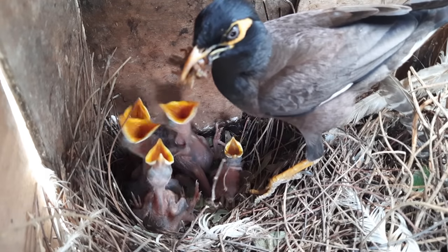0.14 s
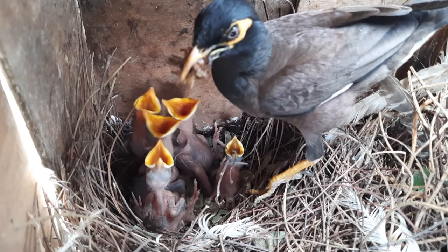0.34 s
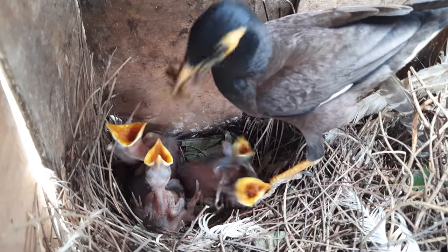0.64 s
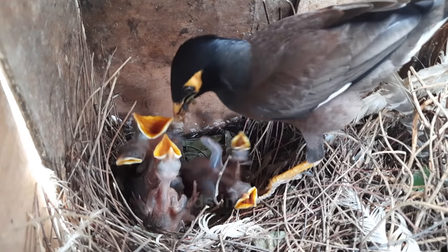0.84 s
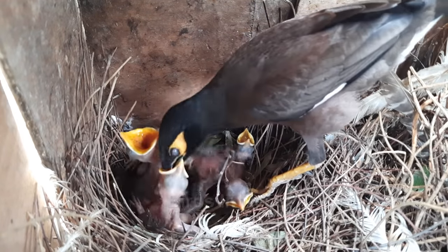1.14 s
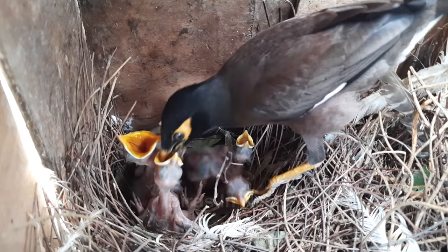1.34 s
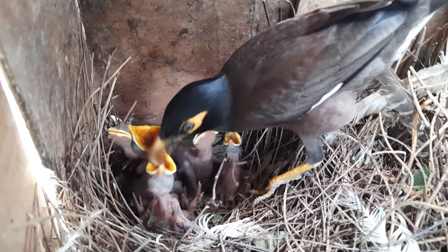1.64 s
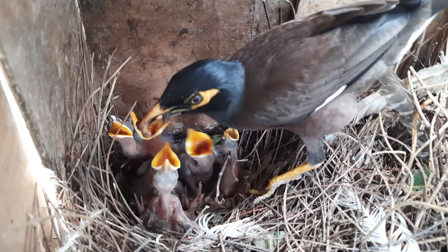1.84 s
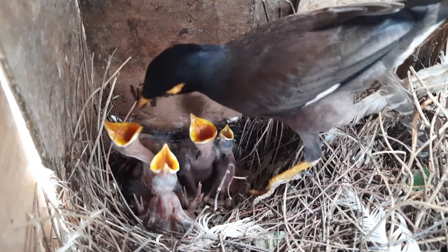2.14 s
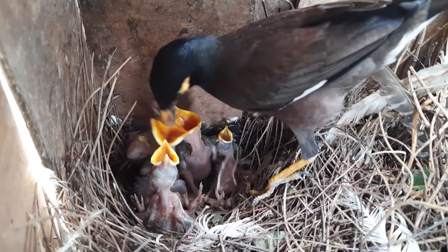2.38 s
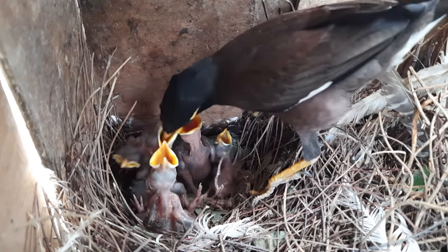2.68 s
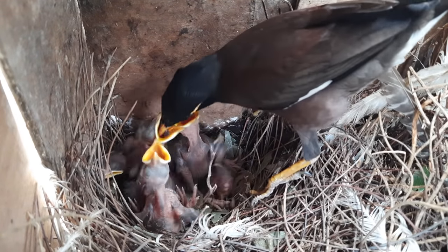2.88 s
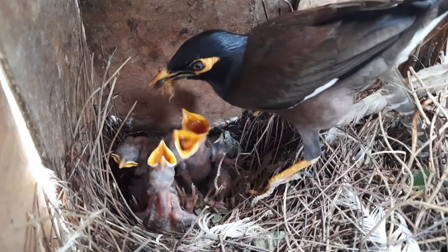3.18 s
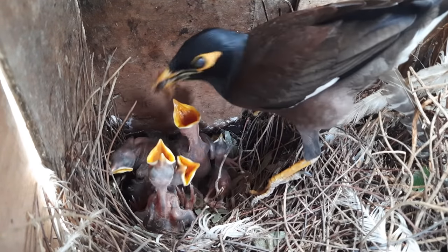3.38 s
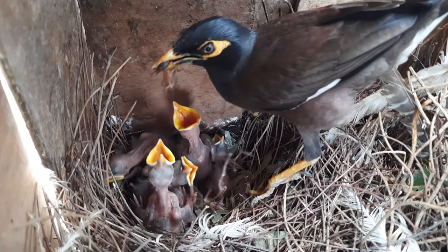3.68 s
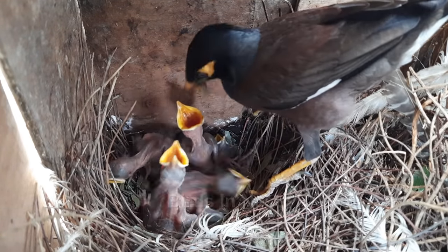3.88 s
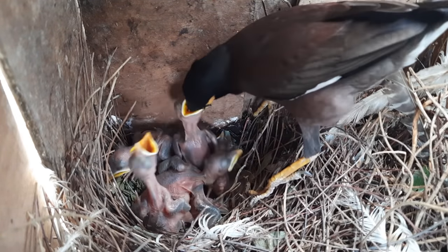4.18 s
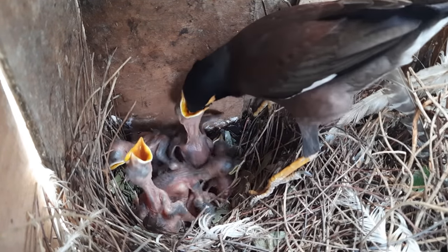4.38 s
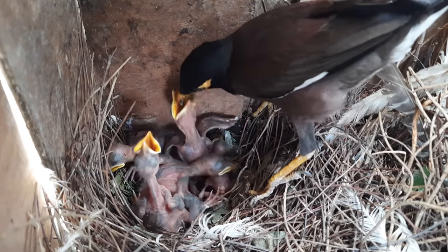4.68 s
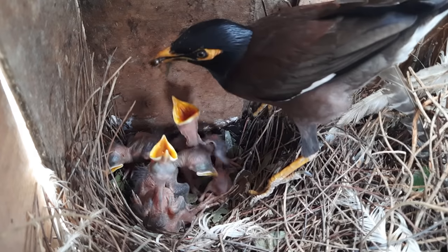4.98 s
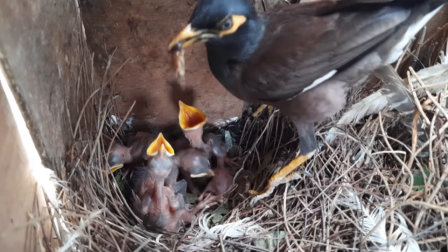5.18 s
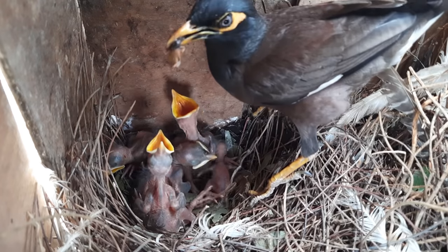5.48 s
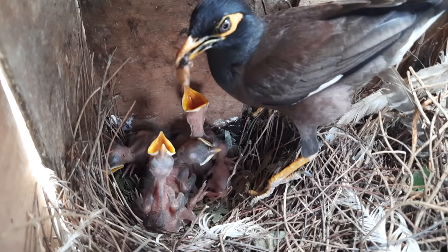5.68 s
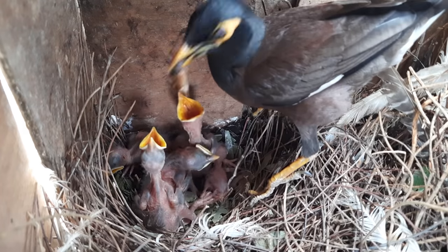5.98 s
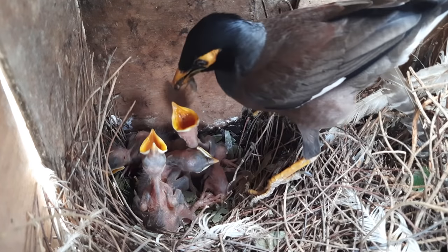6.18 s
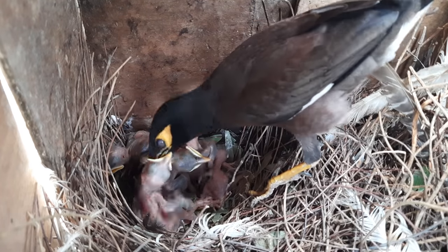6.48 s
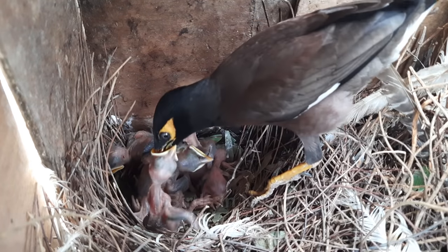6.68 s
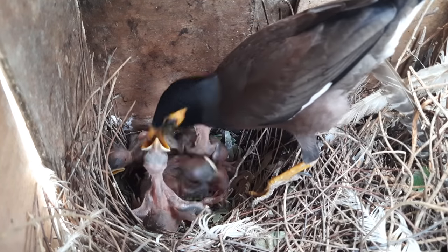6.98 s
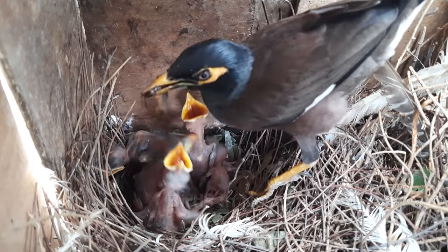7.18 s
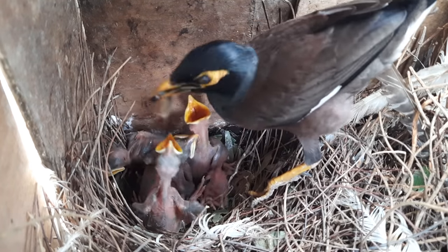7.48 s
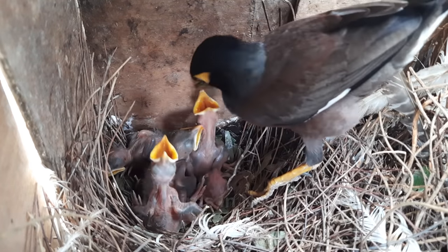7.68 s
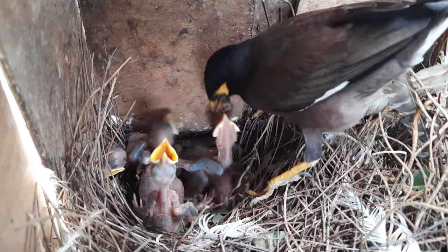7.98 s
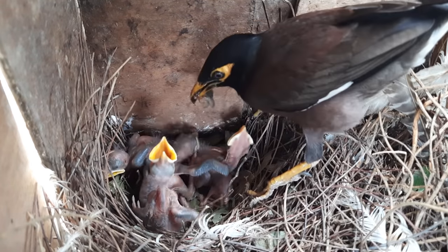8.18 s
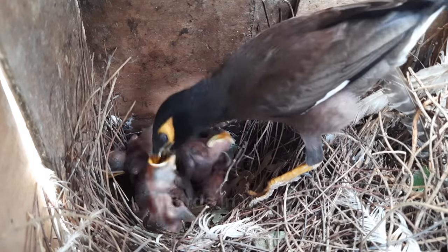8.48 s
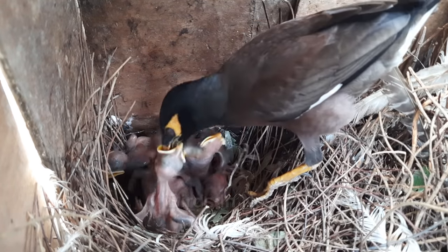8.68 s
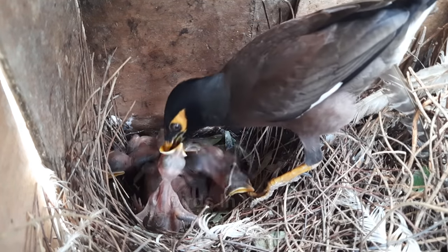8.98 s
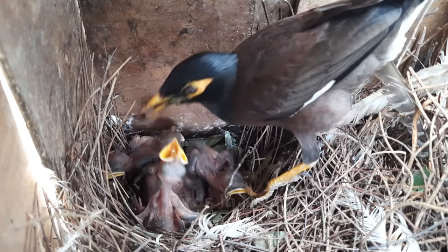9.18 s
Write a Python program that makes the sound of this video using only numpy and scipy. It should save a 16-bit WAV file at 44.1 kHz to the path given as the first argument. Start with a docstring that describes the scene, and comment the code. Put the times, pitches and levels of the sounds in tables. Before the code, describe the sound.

Several baby birds squeak from the start, their short high peeps overlapping with trembling, drooping whines and occasional rasps. The microphone is close, in a wooden nest box where straw crackles and the birds make light knocks and dull thuds. Distant crows caw faintly early on, and another bird hoots later. The begging gradually weakens, and a bill snaps near the end. A high hiss and soft rumble run underneath.

```python
"""Inside a wooden nest box, nestlings beg while a parent feeds them.
Each call is a whistle with overtones: short sliding peeps, and whines, low wheezes and rasps that
waver and droop. Bodies rustle dry straw, feet and beaks bump the boards, a bill clacks shut.
Far crows caw and other birds hoot outside, over a steady high hiss and a low rumble."""
import sys
import numpy as np
from scipy import signal
from scipy.fft import rfft, irfft
from scipy.io import wavfile
from scipy.ndimage import map_coordinates

SR = 44100
rng = np.random.default_rng(int(sys.argv[2]) if len(sys.argv) > 2 else 0)


def master(y):
    """Save y as 16-bit WAV."""
    cut = np.clip(np.atleast_2d(y).T, -1, 1)
    pcm = np.round(cut * 32767)  # scale
    wavfile.write(sys.argv[1], SR, pcm.astype(np.int16))


N = 411894
TIME = np.arange(N) / SR


def amp(db):
    return 10 ** (np.asarray(db) / 20)


def unit(x):
    return x / np.sqrt(np.mean(x ** 2) + 1e-20)


def sides(pan_db):
    """Stereo gains of mean power 1; pan is left minus right."""
    return unit(amp([[pan_db / 2], [-pan_db / 2]]))


def add(mix, start_s, sound):
    """Mixes a stereo sound in."""
    part = mix[:, max(round(start_s * SR), 0):][:, :sound.shape[1]]
    part += sound[:, :part.shape[1]]


def colour(x, spectrum):
    """Filters by (Hz, dB) points on a log-frequency axis."""
    hz, db = np.transpose(spectrum)
    bins_hz = np.fft.rfftfreq(x.shape[-1], 1 / SR)
    gain = amp(np.interp(np.log(bins_hz + 1), np.log(hz), db))
    return irfft(rfft(x) * gain, x.shape[-1])


def db_at(hz, curve):
    return np.interp(hz, *np.transpose(curve))


def wander(t, hz):
    """Smooth unit-size noise, about hz changes a second."""
    knots = rng.standard_normal(4096)
    return map_coordinates(knots, [(t - t[0]) * hz], order=3, mode="wrap")


def pair(x, likeness):
    """Makes two unrelated channels partly alike."""
    return np.array([x[0], likeness * x[0] + np.sqrt(1 - likeness ** 2) * x[1]])


def echoes(x, t60_s, gap_s):
    """Dense decaying reflections after a gap, different on each side."""
    t = np.arange(SR // 2) / SR
    tail = rng.standard_normal((2, len(t))) * amp(-60 * t / t60_s) * (t > gap_s)
    tail /= np.linalg.norm(tail, axis=1, keepdims=True)
    return signal.fftconvolve(x, tail, axes=1)[:, :N]


# Noise spectra. Each row: frequency in Hz, relative level in dB.
HISS = [(1500, -28), (3300, -31), (4000, -17.5), (4700, -2.5), (6300, 5), (7300, -1), (8500, -8),
        (10500, -22), (13000, -30.5), (16000, -46)]
RUMBLE = [(20, -39), (45, 0.5), (70, -2.5), (150, 1.5), (230, -2), (400, -7), (750, -11.5), (1200, -23.5),
          (2200, -63), (4000, -41), (16000, -63)]


def background(drone_hz=75):
    """Wide high hiss and low outdoor rumble; a drone swells once."""
    hiss = unit(colour(rng.standard_normal((2, N)), HISS)) * sides(-2.5) * amp(-41)
    rumble = unit(colour(pair(rng.standard_normal((2, N)), 0.74), RUMBLE)) * sides(15.7)
    swell = np.exp(-((TIME - 8.25) / 0.5) ** 2)
    drone = amp(-50.5) * swell * np.sin(2 * np.pi * drone_hz * TIME + wander(TIME, 8)) * sides(4.6)
    drift_db = 1.5 * wander(TIME, 4)
    return hiss + rumble * amp(-55 + drift_db) + drone


# Spectra of floor scuff and dry straw. Each row: frequency in Hz, relative level in dB.
SCUFF = [(30, -50), (80, 2), (160, 3), (400, -4), (730, -4.5), (1100, -13), (1600, -16.5), (2200, -22.5),
         (4000, -30.5), (16000, -17)]
STRAW = [(200, -20), (1000, 0.5), (2500, -24.5), (4500, -0.5), (7000, -8), (10000, -1.5), (15500, -14)]
# Stirring in the nest. Each row: middle and half length in seconds, level in dB, claw offset in dB.
BOUTS = [(0.674, 0.12, -42.5, -15), (1.095, 0.3, -50, 1.5), (1.684, 0.082, -52, 8.5),
         (2.44, .25, -53.5, -6), (2.84, 0.39, -56, 1.5), (3.896, 0.24, -49, -4), (4.32, 0.21, -51.5, 1),
         (5.04, 0.31, -51, -0.5), (5.576, 0.022, -49.5, 3.5), (6.493, 0.089, -48.5, 3),
         (6.923, 0.15, -55, -1.5), (7.324, 0.54, -56, -14), (7.94, 0.26, -46, -3),
         (8.653, 0.15, -47.5, -1.5), (9, 0.1, -51, 2)]


def rustle(rest_db=-62.5, ticks_per_s=260):
    """Bodies scuff the nest floor, never quite still; straws tick, most under claws."""
    stir = scratch = amp(rest_db)
    for middle_s, half_s, db, claws_db in BOUTS:
        bout = amp(db) * np.exp(-((TIME - middle_s) / half_s) ** 2)
        stir = np.hypot(stir, bout)
        scratch = np.hypot(scratch, bout * amp(claws_db))
    grains = rng.standard_normal((2, N)) * amp(5 * np.tanh(wander(TIME, 45)))
    scuff = unit(colour(pair(grains, 0.24), SCUFF)) * sides(10.8) * amp(3) * stir
    ticks = (rng.random(N) < ticks_per_s / SR) * amp(3.8 * np.minimum(rng.exponential(1, N), 4))
    crackle = unit(colour(echoes(np.array([ticks, ticks]), t60_s=0.046, gap_s=0), STRAW))
    return scuff + crackle * sides(7.8) * amp(0.86) * scratch


def gate(t, attack_s, release_s):
    """Linear fade in and out."""
    return np.clip(np.minimum(t / attack_s, (t[-1] - t) / release_s), 0, 1)


# Moments of vocal strain. Each row: middle and half length in seconds.
STRAINS = [(0.983, 0.027), (1.72, 0.082), (2.39, .015), (2.534, 0.019), (2.902, 0.019), (3, 0.011),
           (3.102, 0.018), (3.766, 0.021), (4.267, 0.022), (4.382, 0.051), (4.952, 0.079), (5.726, 0.041),
           (7.29, 0.1), (7.927, 0.027), (8.02, 0.034), (8.535, 0.037), (8.69, 0.084)]
# The gape dulls the top overtones. Each row: frequency in Hz, gain in dB.
GAPE = [(8000, 0), (10500, 1), (12000, -4), (13500, -14), (16000, -17)]


def syrinx(t, hz, envelope, second_db, *, slope_db, delay_ms,
           jitter, shimmer_db, trill_hz, trill_depth, strain_depth, hoarse):
    """A trembling whistle with overtones; under strain a fast trill makes it rasp."""
    strain = sum(np.exp(-((t - middle_s) / half_s) ** 4) for middle_s, half_s in STRAINS)
    trill = np.sin(2 * np.pi * np.cumsum(trill_hz * (1 + 0.12 * wander(t, 74))) / SR)
    rasp = strain * strain_depth * (trill + 0.5 * wander(t, 697))
    wobble = jitter * wander(t, 700) + 0.009 * wander(t, 90)
    hz = hz * (1 + wobble + trill_depth * trill + rasp)
    flutter = 1 + hoarse * (1 + 2 * strain) * wander(t, 1100)
    envelope = envelope * flutter * amp(shimmer_db * wander(t, 150.4))
    right_lag_s = delay_ms / 1000 * (1 + 0.34 * wander(t, 23.4))  # heads sway
    turns = np.cumsum(hz) / SR - np.array([[0], [1]]) * right_lag_s * hz
    voice = np.sin(2 * np.pi * turns)
    for k in range(2, 6):
        # random ripple stands for overtones crossing the gape's resonances
        ripple_db = 5 * (np.tanh([wander(t, 160), wander(t, 160)]) - 0.5)
        blur_rad = (0.4 + 0.4 * strain) * wander(t, 800)
        harmonic_db = second_db + slope_db * (k - 2.5) + ripple_db + db_at(k * hz, GAPE)
        voice += amp(harmonic_db) * (k * hz < SR / 2) * np.sin(2 * np.pi * k * turns + blur_rad)
    return np.sqrt(2) * envelope * voice


# Each row: start and length in seconds, first and last pitch in Hz, bend exponent (above 1 the
# pitch holds, then slides), level in dB, base overtone level in dB, pan in dB.
PEEPS = [(0.055, 0.032, 7090, 4210, 0.71, -22.5, -13.5, 1), (0.3, 0.024, 4890, 4300, 1.1, -28, -7, 2),
         (0.482, 0.049, 7050, 4100, 0.53, -19.5, -19.5, 2.5), (0.578, 0.027, 5370, 4260, 3, -17.5, -26, 7),
         (0.892, 0.047, 6200, 4360, 0.51, -22.5, -17, 0.5), (1.285, 0.027, 5910, 4550, 5.5, -13, -16.5, 9),
         (1.308, 0.026, 4850, 4360, 0.32, -30, -17, 1), (1.552, 0.054, 5370, 4830, 2.4, -29, -31, 11),
         (2.052, 0.033, 5800, 5070, 0.79, -20.5, -10, 10), (2.061, 0.049, 6190, 4890, 1.1, -15, -15, -0.5),
         (2.144, 0.027, 5780, 5600, 1.5, -36.5, -6, 5), (2.278, 0.032, 5540, 4000, 2.6, -22.5, -15.5, 1.5),
         (2.507, 0.057, 6160, 4774, 0.82, -21, -13, 1), (2.527, 0.041, 5800, 4980, 1.6, -20, -7.5, 0),
         (2.611, 0.034, 6570, 5420, 0.98, -27, -7, 3), (2.892, 0.04, 5550, 4350, 1.05, -29.5, -15.5, 13),
         (2.935, 0.03, 5575, 5200, 4.5, -17.5, -10.5, 5), (3.18, 0.05, 4394, 3650, 1.3, -17.5, -31, 8.5),
         (3.592, 0.027, 5610, 4430, 2.4, -15.5, -14, 9), (3.601, 0.048, 5820, 4600, 3.3, -18.5, -18, 3),
         (3.692, 0.11, 5430, 4080, 1.02, -21.5, -15.5, 1.5),
         (4.152, 0.022, 5860, 5100, 1.14, -16.5, -23, 5), (4.164, 0.031, 5720, 5180, 3.1, -14, -19.5, 11),
         (4.753, 0.019, 5580, 5070, 1.5, -17.5, -17.5, 9), (4.767, 0.028, 5730, 4720, 2.9, -13.5, -22, 9.5),
         (4.863, 0.025, 5230, 5000, 1.04, -29, -14.5, 0), (4.918, 0.044, 5570, 5840, 1.4, -28, -22, 6),
         (5.347, 0.043, 5870, 4890, 1.2, -17.5, -15.5, 5),
         (5.698, 0.084, 5800, 4310, 0.91, -27.5, -22.5, 6.5), (5.984, 0.038, 5480, 4540, 1.2, -27, -13, 3),
         (5.991, 0.035, 5500, 5030, 3, -17.5, -23.5, 7), (6.087, 0.036, 4850, 5210, 2.1, -23.5, -18, 0.5),
         (6.445, 0.035, 5450, 5570, 1.8, -34, -13.5, 8), (6.475, 0.034, 3850, 3780, 1.1, -25.5, -18, 1.5),
         (6.937, 0.037, 4690, 4990, 0.8, -34, -15, 6), (7.166, 0.053, 5530, 5230, 1.5, -29.5, -24, 5),
         (7.194, 0.038, 3900, 4130, 1.2, -34.5, -16, 5), (7.59, 0.05, 5584, 4780, 4.6, -12, -12, 5.5),
         (7.696, 0.021, 5345, 5070, 1.1, -18, -12.5, -0.5), (7.769, 0.022, 6080, 5190, 1.5, -25.5, -19, 6),
         (7.879, 0.065, 5410, 4930, 2.6, -33, -18, 7), (8.611, 0.033, 5750, 5730, 3.0, -36, -28, 5)]
# Peep strength by pitch. Each row: pitch in Hz, gain in dB.
PEEP_RESPONSE = [(4200, 1), (4900, -1), (5600, 0), (6300, -.5), (7100, 2)]


def peeps(gain_db, overtone_db, fade_db, **voice):
    """A peep starts sharply, then slides in pitch as it fades."""
    out = np.zeros((2, N))
    for start_s, length_s, first_hz, last_hz, bend, db, second_db, pan_db in PEEPS:
        t = np.arange(0, length_s, 1 / SR)
        hz = first_hz + (last_hz - first_hz) * (t / length_s) ** bend
        level_db = gain_db + db + fade_db * (t / length_s) ** 2 + db_at(hz, PEEP_RESPONSE)
        envelope = gate(t, attack_s=0.0028, release_s=0.003) * amp(level_db)
        peep = syrinx(start_s + t, hz, envelope, second_db + overtone_db, **voice)
        add(out, start_s, peep * sides(pan_db))
    return out


# Each row: start and length in seconds, pitch in Hz, swing as a fraction, crest offset and swing
# period in seconds, droop as a fraction, then level, level change, base overtone level and pan in dB.
WHINES = [(0.142, 0.042, 4700, 0.13, 0.015, 0.054, 0, -27, -5.5, -14, 6),
          (0.203, 0.048, 4530, 0.09, -0.0006, 0.055, 0.081, -30.5, -10, -10, 10),
          (0.21, 0.094, 5040, 0.042, 0.095, 0.18, 0.061, -20, -29, -3.5, 1),
          (0.316, 0.18, 4790, 0.13, 0.085, 0.3, 0.22, -23.5, -17, -6, 7),
          (0.366, 0.093, 4450, 0.058, 0.079, 0.082, 0.13, -45.5, 8, -5, 15),
          (0.596, 0.1, 4370, 0.016, 0.071, 0.11, 0.049, -35, -6, -13.5, 2),
          (0.948, 0.12, 4420, 0.057, 0.048, 0.096, 0.0075, -25, -1.5, -21.5, 9),
          (0.981, 0.12, 4790, 0.075, 0.0065, 0.11, 0.035, -17.5, -24, -9, -5),
          (1.06, 0.13, 4416, 0.034, 0.042, 0.14, 0.11, -29.5, 9, -19.5, 11),
          (1.366, 0.093, 4775, 0.095, 0.025, 0.058, 0.23, -26.5, -6, -12, 1),
          (1.56, 0.26, 4444, 0.052, 0.078, 0.099, 0.015, -25.5, -4.5, -17, 8.5),
          (1.671, 0.17, 4000, 0.046, 0.011, 0.051, 0.079, -34.5, -7.5, -14, 17),
          (1.845, 0.054, 4900, 0.11, 0.022, 0.044, 0.0091, -21.5, -8, -19.5, 3),
          (1.938, 0.058, 4700, 0.099, 0.02, 0.042, 0.26, -28.5, -3, -16.5, 8.5),
          (2.291, 0.102, 3965, 0.068, 0.0083, 0.082, 0.11, -33.5, 1.5, -30, 18),
          (2.291, 0.17, 4510, 0.046, -0.018, 0.12, 0, -32.5, -0.5, -21.5, 3.5),
          (2.39, 0.055, 4340, 0.026, -0.018, 0.081, 0.0, -26, 6.5, -31, 15),
          (2.444, 0.096, 4160, 0.047, 0.052, 0.1, 0.1, -14, -16.5, -27, 15),
          (2.913, 0.24, 4546, 0.076, 0.074, 0.11, 0.06, -23, -6, -26, 12.5),
          (3.005, 0.27, 4860, 0.12, 0.033, 0.11, 0.27, -17, -19, -11.5, 3.5),
          (3.584, 0.29, 4140, 0.047, 0.0013, 0.094, 0.028, -28, -8.5, -27, 7.5),
          (3.87, 0.096, 4590, 0.058, 0.049, 0.066, 0.31, -33.5, -6.5, -19, 2.5),
          (4.263, 0.25, 4426, 0.032, 0.009, 0.087, 0.087, -26, -6.5, -22, 8),
          (4.955, 0.27, 4573, 0.073, 0.041, 0.199, 0.1, -30, -12, -18, 2),
          (5.76, 0.09, 4476, 0.0072, 0.11, 0.11, 0.039, -32, 0.5, -20, 5),
          (5.842, 0.15, 4736, 0.087, 0.0013, 0.16, 0.068, -28.5, -10, -18.5, 1),
          (6.505, 0.11, 4210, 0.079, 0.015, 0.19, 0.08, -35.5, 5, -26, 2),
          (6.607, 0.12, 4390, 0.039, 0.01, 0.21, 0.029, -32, -11.5, -23, 4),
          (7.192, 0.24, 4350, 0.074, 0.129, 0.32, 0.032, -35, -4, -24, 1.5),
          (7.904, 0.27, 4695, 0.034, 0.06, 0.099, 0.065, -33, -5, -28, -2.5),
          (7.927, 0.15, 5380, 0.059, 0.061, 0.11, 0, -38, 2.5, -18, 13),
          (8.645, 0.17, 4910, 0.055, 0.058, 0.066, 0.0052, -33, -1, -19, -1),
          (8.664, 0.23, 5660, 0.02, -0.043, 0.091, 0.0, -34.5, 3, -11.5, 10),
          (8.812, 0.1, 4420, 0.0039, 0.08, 0.13, 0.041, -37.5, -0.5, -23, 4.5)]
WHEEZES = [(0.372, 0.079, 2730, 0.02, 0.032, 0.066, 0.075, -35, -6.5, 9, 6.5),
           (0.512, 0.072, 2410, 0.019, -0.0031, 0.11, 0.092, -40.5, -1, 8.5, 2),
           (1.027, 0.086, 3294, 0.1, 0.044, 0.11, 0.08, -38, -1, -3, 6),
           (1.108, 0.138, 2956, 0.1, 0.075, 0.23, 0.18, -37, 0, -1, 0.5),
           (1.68, 0.099, 2970, 0.031, 0.023, 0.18, 0.25, -42, 3.5, 7, 1),
           (2.36, 0.046, 2760, 0.052, 0.014, 0.076, 0.077, -38.5, 3.5, 6.5, 2.5),
           (3.064, 0.083, 2875, 0.14, 0.039, 0.085, 0.042, -32.5, -7, 1.5, 6),
           (3.134, 0.14, 2604, 0.037, 0.084, 0.11, 0.15, -29.5, -4.5, -5, 5.5),
           (3.77, 0.029, 2655, 0.011, -0.0016, 0.101, 0.098, -41.5, -7, 12, 7),
           (3.915, 0.072, 2770, 0.05, 0.02, 0.086, 0.22, -40, 7.5, -5, 4),
           (4.674, 0.079, 2997, 0.093, 0.024, 0.11, 0.15, -28, -4.5, -2.5, 3.5),
           (4.745, 0.082, 2513, 0.077, 0.06, 0.13, 0.0, -32, -0.5, -8, 4),
           (4.828, 0.059, 3980, 0.025, -0.005, 0.086, 0.15, -49, 4, -22, 12),
           (5.483, 0.25, 3743, 0.064, 0.027, 0.144, 0.26, -35, -10, -15.5, 8.5),
           (6.439, 0.11, 3670, 0.089, -0.0019, 0.15, 0.3, -32.5, -13, -24, 6),
           (6.573, 0.17, 2980, 0.044, 0.024, 0.11, 0.16, -42.5, -3.5, -16, 4),
           (7.526, 0.27, 3296, 0.1, 0.025, 0.13, 0.23, -35.5, -10.5, -15, 5.5),
           (8.611, 0.121, 3390, 0.015, 0.032, 0.054, 0.25, -32.5, -6.5, -10, 1.5)]
RASPS = [(1.674, 0.11, 6550, 0.08, 0.0119, 0.078, 0.28, -28, -6, -9.5, -3),
         (3.734, 0.092, 5700, 0.028, 0.024, 0.091, 0.091, -29, -8.5, -11, -1),
         (4.256, 0.18, 5160, 0.038, 0.02, 0.08, 0.036, -29.5, -10, -12, 4),
         (7.265, 0.106, 5150, 0.061, 0.06, 0.11, 0.0091, -37, -5, -11.5, 11),
         (8.493, 0.086, 3610, 0.08, 0.045, 0.08, 0.04, -33.5, -2.5, -11.5, 11)]
# Call strength by pitch. Each row: pitch in Hz, gain in dB.
WHINE_RESPONSE = [(3500, 0), (4250, 5), (5300, -5.5)]
WHEEZE_RESPONSE = [(2000, -16), (2600, -3), (3800, 5.5)]
RASP_RESPONSE = [(3000, -2.5), (5500, 1), (7000, 5.5)]


def wavering_calls(calls, response, droop_bend, overtone_db, **voice):
    """The pitch swings, and droops as the air runs out; loudness depends on pitch."""
    out = np.zeros((2, N))
    for start_s, length_s, pitch_hz, swing, crest_s, period_s, droop, *levels_db in calls:
        db, change_db, second_db, pan_db = levels_db
        t = np.arange(0, length_s, 1 / SR)
        waver = 1 + swing * np.cos(2 * np.pi * (t - crest_s) / period_s)
        hz = pitch_hz * waver * (1 - droop * (t / length_s) ** droop_bend)
        level_db = db + change_db * t / length_s + db_at(hz, response)
        envelope = gate(t, attack_s=0.007, release_s=0.016) * amp(level_db)
        call = syrinx(start_s + t, hz, envelope, second_db + overtone_db, **voice)
        add(out, start_s, call * sides(pan_db))
    return out


# Each row: start and length in seconds, pitch in Hz, level in dB.
CAWS = [(0.169, 0.26, 1542, -61.5), (1.057, 0.16, 1420, -57.5), (1.513, 0.24, 1492, -57.5),
        (2.192, 0.24, 1468, -61), (2.727, 0.255, 1426, -62), (3.183, 0.23, 1440, -62.5),
        (9.144, 0.16, 1470, -60)]
# Each row: start and length in seconds, first and last pitch in Hz, level in dB.
HOOTS = [(2.992, 0.15, 1147, 1292, -63.5), (5.004, 0.15, 524, 636, -44), (5.347, 0.105, 2126, 1980, -67),
         (7.369, .13, 563, 484, -52.5)]


def far_birds(rough_hz=115):
    """Hoarse falling caws and gliding hoots, blurred by the yard."""
    out = np.zeros((2, N))
    for start_s, length_s, hz, db in CAWS:
        t = np.arange(0, length_s, 1 / SR)
        turns = np.cumsum(hz * (1.04 - 0.094 * t / length_s + 0.0505 * wander(t, 389.3))) / SR
        caw = np.sin(2 * np.pi * turns + 1.43 * np.sin(2 * np.pi * rough_hz * t))
        add(out, start_s, amp(db) * unit(caw * signal.windows.tukey(len(t), 0.5)) * sides(1))
    for start_s, length_s, first_hz, last_hz, db in HOOTS:
        t = np.arange(0, length_s, 1 / SR)
        hz = np.linspace(first_hz, last_hz, len(t)) * (1 + 0.0455 * wander(t, 128.6))
        hoot = np.sin(2 * np.pi * np.cumsum(hz) / SR) * np.hanning(len(t))
        add(out, start_s, amp(db) * unit(hoot) * sides(2.9))
    return 0.56 * out + 1.08 * echoes(out, t60_s=0.42, gap_s=0.003)


# Each row: frequency in Hz, relative level in dB, T60 in seconds.
BOX_MODES = [(92, -7, 0.086), (157, 0, .12), (180, -8, 0.33), (297, -20, 0.18), (420, -29, 0.0082),
             (561.4, 13.5, 0.17), (726, -21, 0.21), (1053, 10, 0.15), (1430, 9, 0.075)]
# Each row: start in seconds, level in dB, straw snap offset in dB.
BUMPS = [(0.538, -35.5, -6), (0.633, -24.5, -14), (0.66, -29, -3), (0.707, -22.5, -14), (0.904, -39, -11),
         (1.432, -37.5, 3.5), (2.75, -31.5, -14), (2.863, -33.5, -6.5), (3.686, -37.5, -1),
         (3.78, -33, -21), (3.906, -38.5, 0), (4.108, -34, -25), (4.348, -33.5, -10), (5.581, -39, -11),
         (7.022, -36, -10), (7.378, -34.5, -7), (7.982, -34, -2), (8.018, -35.5, -6), (8.409, -32, -12),
         (8.68, -38, -4), (9.025, -31.5, -7.5), (9.079, -36.5, -3)]


def bumps():
    """Feet and beaks ring the boards briefly and snap some straw."""
    out, t = np.zeros((2, N)), np.arange(8192) / SR
    for start_s, db, snap_db in BUMPS:
        ring = np.zeros(len(t))
        for hz, mode_db, t60_s in BOX_MODES:
            mode = np.sin(2 * np.pi * hz * rng.uniform(0.95, 1.05) * t)
            ring += amp(mode_db - 60 * t / t60_s) * mode * rng.normal()
        crunch = colour(pair(rng.standard_normal((2, len(t))), 0.62), SCUFF)
        crunch *= (1 - np.exp(-t / 0.0076)) * np.exp(-t / 0.024)
        body = 0.4 * ring / abs(ring).max() + 0.8 * crunch / abs(crunch).max()
        snap = unit(colour(rng.standard_normal((2, len(t))), STRAW)) * np.exp(-t / 0.015)
        add(out, start_s, amp(db) * (body * sides(9.7) + amp(snap_db) * snap * sides(1)))
    return out


# Each row: start in seconds, level in dB.
THUMPS = [(0.66, -64), (0.711, -41.5), (2.861, -46), (3.91, -37.5), (4.421, -47.5), (6.94, -42),
          (7.958, -41), (8.109, -59), (8.42, -47), (8.682, -43.5), (9.03, -38.5)]


def thumps():
    """Dull thuds as the birds shift their weight."""
    out, t = np.zeros((2, N)), np.arange(8192) / SR
    spectrum_hz_db = [(30, -35), (80, -11), (180, -4), (400, -19), (1500, -46)]
    envelope = (1 - np.exp(-t / 0.0017)) * np.exp(-t / 0.066)
    for start_s, db in THUMPS:
        thud = unit(colour(rng.standard_normal(len(t)), spectrum_hz_db))
        add(out, start_s, amp(db) * thud * envelope * sides(6.7))
    return out


# Each row: start in seconds, peak level in dB.
CLACKS = [(8.0228, -16), (8.383, -31), (5.2, -49)]


def clacks(decay_s=0.0055):
    """The hard bill snaps shut with a bright crack."""
    out, t = np.zeros((2, N)), np.arange(2048) / SR
    for start_s, peak_db in CLACKS:
        crack = colour(rng.standard_normal((2, len(t))), STRAW) * np.exp(-t / decay_s)
        add(out, start_s, amp(peak_db) * crack / abs(crack).max())
    return out


def scene():
    """The brood in its box, with the nest and the yard around it."""
    brood = peeps(
        gain_db=0.7, overtone_db=2.5, fade_db=-15.5, slope_db=-8, delay_ms=0.125,
        jitter=0.004, shimmer_db=0.8, trill_hz=380, trill_depth=0.004, strain_depth=0.012, hoarse=0.05)
    brood += wavering_calls(
        WHINES, WHINE_RESPONSE, droop_bend=5.7, overtone_db=1, slope_db=-4, delay_ms=0.12,
        jitter=0.005, shimmer_db=2.2, trill_hz=260, trill_depth=0.005, strain_depth=0.017, hoarse=0.08)
    brood += wavering_calls(
        WHEEZES, WHEEZE_RESPONSE, droop_bend=1.5, overtone_db=2.1, slope_db=-2.5, delay_ms=0.11,
        jitter=0.005, shimmer_db=2.4, trill_hz=202, trill_depth=0.003, strain_depth=0.002, hoarse=0.05)
    brood += wavering_calls(
        RASPS, RASP_RESPONSE, droop_bend=1, overtone_db=-0.7, slope_db=-2, delay_ms=0.125,
        jitter=0.007, shimmer_db=2.8, trill_hz=300, trill_depth=0.015, strain_depth=0.008, hoarse=0.13)
    walls = amp(-13) * echoes(brood, t60_s=0.05, gap_s=0.001)
    return brood + walls + rustle() + bumps() + thumps() + clacks() + far_birds() + background()


def record(dry):
    """Steep low-pass."""
    cutoff_hz = 16000
    taps = signal.firwin(511, cutoff_hz, window=("kaiser", 9), fs=SR)
    return signal.oaconvolve(dry, taps[None], "same")


dry = scene()
out = record(dry)
master(out)
```